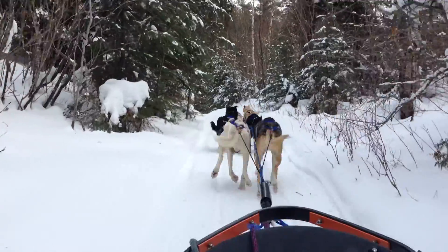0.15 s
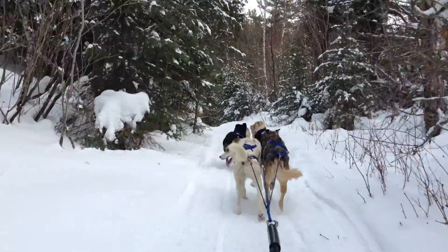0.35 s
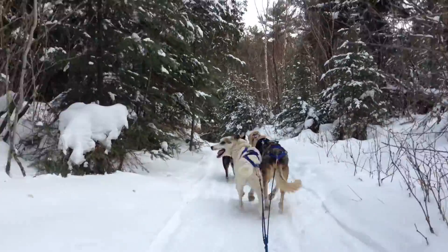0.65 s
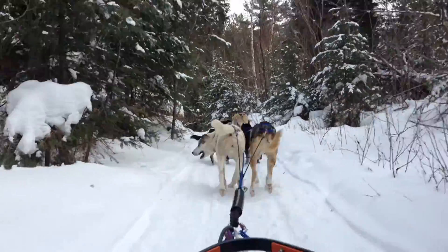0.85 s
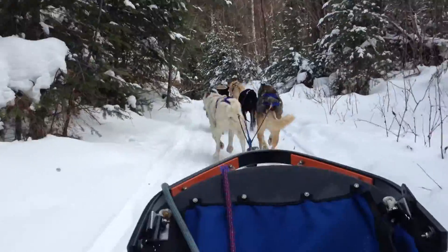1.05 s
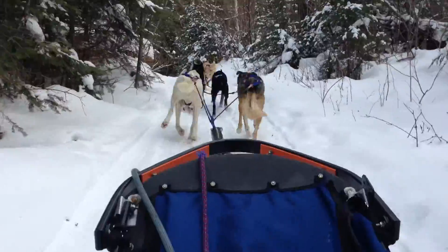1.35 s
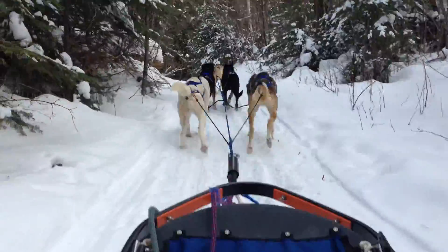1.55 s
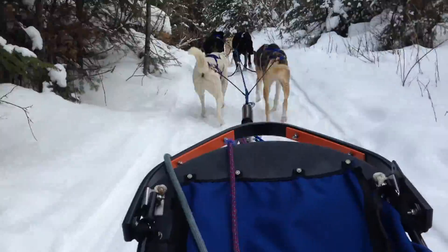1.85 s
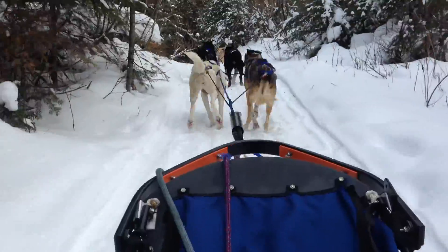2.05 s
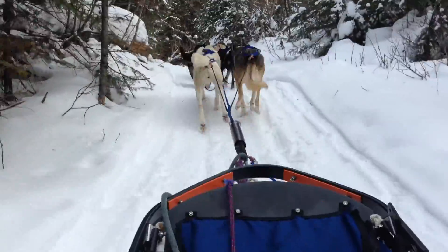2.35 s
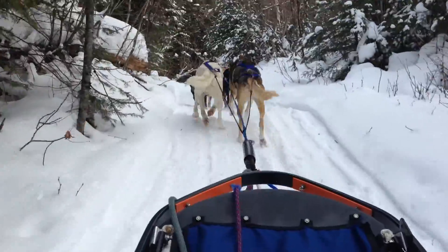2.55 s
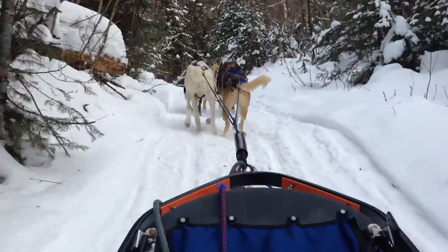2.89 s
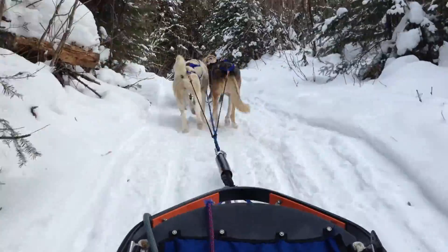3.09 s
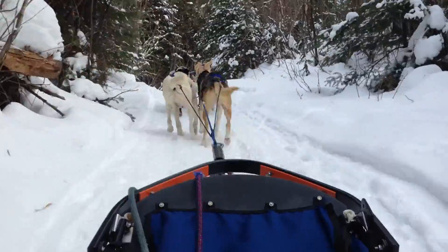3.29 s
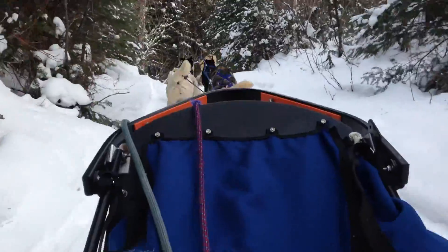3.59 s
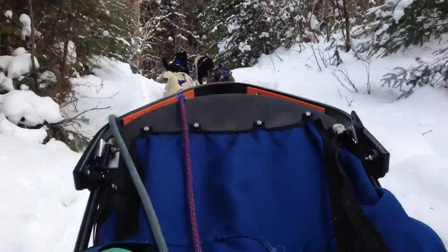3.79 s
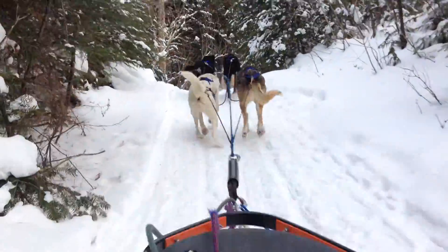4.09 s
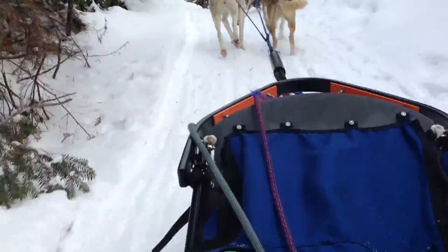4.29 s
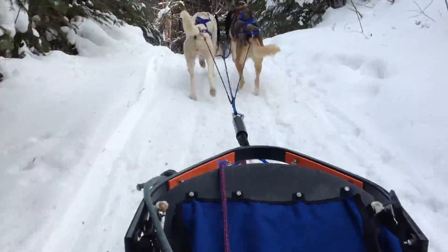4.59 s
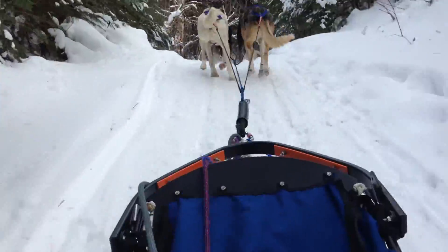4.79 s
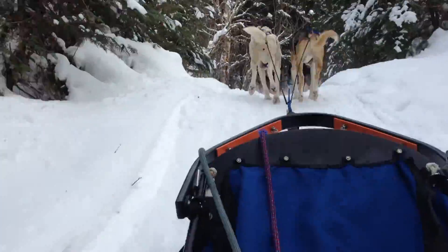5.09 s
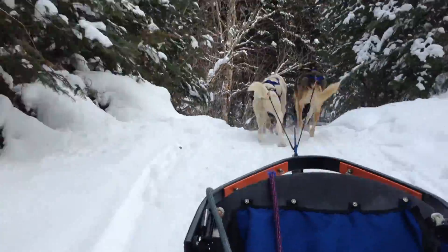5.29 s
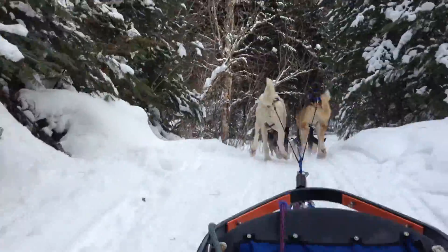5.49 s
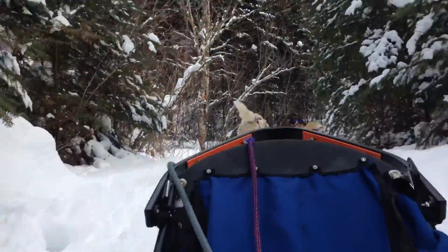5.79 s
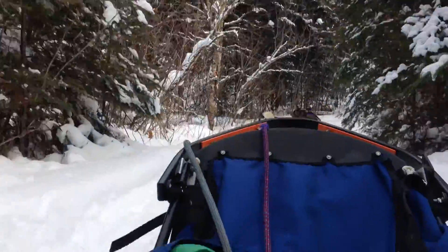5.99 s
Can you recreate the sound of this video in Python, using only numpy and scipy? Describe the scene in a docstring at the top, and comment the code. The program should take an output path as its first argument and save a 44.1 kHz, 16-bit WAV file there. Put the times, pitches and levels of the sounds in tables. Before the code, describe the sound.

Uneven low rumble of sled runners on snow with faint hiss, broken by hard jolting thuds, wooden knocks and brief plastic creaks.

```python
"""A sled's runners rumble, crunch and hiss along a bumpy snow trail: filtered noise plus tiny crust tones.
Jolts thump as short low swings, and noise bursts through resonances make woody knocks of the frame.
The plastic camera mount ticks (filtered clicks), scuffs (filtered noise) and squeals (wavering tones).
Outdoors, on the moving sled: the microphone is in a small camera carried by the driver."""
import sys
import numpy as np
from scipy import signal
from scipy.fft import rfft, irfft, next_fast_len
from scipy.io import wavfile
from scipy.ndimage import uniform_filter1d, minimum_filter1d, map_coordinates

SR = 44100
rng = np.random.default_rng(int(sys.argv[2]) if len(sys.argv) > 2 else 0)


def int16_out(signal):
    """Quantize to a 16-bit WAV file."""
    q = np.round(np.clip(np.atleast_2d(signal).T, -1, 1) * 32767)
    wavfile.write(sys.argv[1], SR, q.astype(np.int16))


N = 270774  # length in samples


def amp(db):
    """Amplitude factor for a level in dB."""
    return 10 ** (np.asarray(db) / 20)


def unit(x):
    """x scaled to an rms of 1."""
    return x / np.sqrt(np.mean(x ** 2) + 1e-20)


def wobble(rate):
    """A smooth random curve, rate knots a second."""
    knots = rng.standard_normal(int(N * rate / SR) + 4)
    return map_coordinates(knots, [np.arange(N) * rate / SR])


def coloured(x, spectrum):
    """x through a causal minimum-phase filter of the (hz, db) shape; white noise keeps its power."""
    m = 2 * next_fast_len(N // 2 + 4096)
    hz, db = np.transpose(spectrum)
    gain = amp(np.interp(np.log(np.fft.rfftfreq(m, 1 / SR) + 1), np.log(hz + 1), db))
    # folding the cepstrum onto positive times makes the filter causal
    cepstrum = irfft(np.log(unit(gain) + 1e-6), m)
    cepstrum[1:m // 2] *= 2
    cepstrum[m // 2 + 1:] = 0
    response = np.exp(rfft(cepstrum))
    return irfft(rfft(x, m) * response, m)[:N]


def gate(rows, rise_ms, fall_ms):
    """Gain that opens at each (start_s, length_ms, level_db) row and dies away after its end."""
    power = np.zeros(N + SR)
    t_ms = np.arange(SR // 5) / SR * 1000
    for start_s, length_ms, level_db in rows:
        rise = 1 - np.exp(-t_ms / rise_ms)
        fall = np.exp(-np.maximum(t_ms - length_ms, 0) / fall_ms)
        power[round(start_s * SR):][:len(t_ms)] += (amp(level_db) * rise * fall) ** 2
    return np.sqrt(power[:N])


def grit(spread_db):
    """White noise whose samples differ widely in size, as breaking crystals do."""
    return unit(rng.standard_normal(N) * amp(spread_db * rng.standard_normal(N)))


def patchy(x, depth_db, size):
    """Random spots of gain over time and pitch: the contact point wanders."""
    z = signal.stft(x, nperseg=128)[2]
    field = rng.standard_normal(z.shape)
    for axis in (0, 1):
        field = uniform_filter1d(field, size, axis)
    return signal.istft(z * amp(depth_db * unit(field)), nperseg=128)[1][:N]


# mount slides regular enough to sing: start_s, length_ms, pitch_hz, level_db (before a fixed lift)
SQUEALS = [(1.601, 17, 5430, -31), (1.632, 20, 5000, -32), (1.641, 7.5, 3480, -30), (1.732, 19, 3190, -58),
           (2.315, 7.6, 8600, -31.5), (2.343, 12, 5350, -34), (4.33, 8, 2650, -46.5),
           (4.432, 6.4, 3420, -54), (4.784, 8.7, 4300, -46), (5.568, 13.7, 5510, -32),
           (5.692, 7, 3320, -36)]


def squeals():
    """Stick and slip at a nearly steady rate: a wavering tone with its octave."""
    out = np.zeros(N)
    for start_s, length_ms, pitch_hz, level_db in SQUEALS:
        t = np.arange(round(length_ms * SR / 1000)) / SR
        wander = np.cumsum(rng.normal(0, 0.093, len(t)))  # radians
        phase = 2 * np.pi * pitch_hz * t + wander
        tone = np.sin(phase) + amp(-11) * np.sin(2 * phase)
        swell = np.sqrt(np.hanning(len(t)))
        out[round(start_s * SR):][:len(t)] += amp(level_db + 3.5) * swell * tone
    return out


# continuous slides of the mount: start_s, length_ms, level_db
SCUFFS = [(.024, 3.7, -40), (.81, 61, -45.5), (.862, 15, -36), (.874, 15.4, -34.5), (.89, 13, -43),
          (1.219, 29, -50), (1.3, 29, -53), (1.604, 9.5, -39), (1.616, 22, -42), (1.634, 20, -32),
          (1.664, 11, -40.5), (1.68, 25, -46.5), (1.73, 12, -44), (2.313, 12.8, -23.5), (2.328, 14, -36.5),
          (2.341, 9, -37), (2.351, 8.9, -28.5), (2.364, 12.5, -41), (2.386, 7.6, -35), (2.397, 16, -46.5),
          (2.766, 98, -53), (3.693, 49, -54.5), (3.764, 6.3, -50), (4.197, 12, -46.5), (4.21, 12.5, -37.5),
          (4.226, 5.4, -40.5), (4.237, 6, -34.5), (4.247, 21, -34), (4.424, 31, -56), (4.782, 24, -50),
          (4.94, 15, -44.5), (5.432, 20, -48.5), (5.514, 15, -43.5), (5.532, 18, -44), (5.548, 8.3, -37),
          (5.57, 22, -41.5), (5.636, 5.3, -44.5), (5.683, 2.5, -44), (5.693, 6.1, -37), (5.703, 56, -54)]
# how the housing colours a slide: freq_hz, relative_db
MOUNT_SPECTRUM = [(880, 1), (1500, -10.5), (2000, 0), (2850, -8.5), (3050, 5.5), (3350, 6.5), (3900, 5.5),
                  (5400, 5), (7400, -3.5), (8200, -7.5), (8800, -5), (10300, -7), (12500, -8.5),
                  (14600, -19), (15600, -20)]


def scuffs():
    """Dense slips of plastic on plastic ring the housing unevenly."""
    uneven = grit(spread_db=3) * amp(0.3 * wobble(370))
    slips = unit(patchy(uneven, depth_db=2.0, size=3))
    return coloured(gate(SCUFFS, rise_ms=1.2, fall_ms=2.2) * slips, MOUNT_SPECTRUM)


# runs of snaps in the mount, a lone snap if length_ms is 0 or less:
# start_s, length_ms, level_db (before lifts and housing filter)
TICKS = [(0.0279, 3.5, -24), (1.2201, 24, -24), (1.3016, 21.5, -26), (1.9209, 22, -38.5),
         (1.9848, -0.5, -34.5), (2.043, -3, -35.5), (2.062, 0, -40.5), (2.3044, 0, -19), (2.3983, 6, -34),
         (2.7666, 34, -30), (2.805, 41, -31.5), (2.9009, -6.5, -40), (3.062, 0, -49), (3.147, 12.5, -25),
         (3.7246, -4, -35), (4.3769, 0, -43), (4.516, 0, -43), (4.577, 0, -40), (5.017, 0, -37.5),
         (5.1953, 0, -33), (5.3054, 0, -41.5), (5.4065, 0, -35), (5.4244, 31, -37.5), (5.4835, 0, -33),
         (5.513, 0, -34), (5.64, 0, -35)]
# how the housing rings to a single snap: freq_hz, relative_db
SNAP_SPECTRUM = [(900, -6), (1800, -10), (2700, -5.5), (3200, -1.5), (5500, 3), (7500, -4.5), (8250, -14),
                 (9000, -8), (10500, -4), (12300, -9.5), (14600, -23), (15600, -48)]
SNAP_GAP_MS, SNAP_SCATTER_MS, SNAP_SPREAD_DB = 6.2, 1.2, 3.5  # within a run
FIRST_SNAP_DB = 3.5  # the snap that breaks the mount loose, over the rest of its run


def ticks():
    """Each snap is one sharp slip, then a weak chatter; in a run they follow at uneven gaps."""
    slips = np.zeros(N + SR)
    for start_s, length_ms, level_db in TICKS:
        count = int(length_ms / SNAP_GAP_MS + .5) + 1
        late, big = rng.standard_normal((2, count))
        follows = np.arange(count) > 0
        offsets_ms = np.linspace(0, length_ms, count) + SNAP_SCATTER_MS * late * follows
        starts = start_s + offsets_ms / 1000
        sizes_db = level_db + 4.5 + np.where(follows, SNAP_SPREAD_DB * big, FIRST_SNAP_DB)
        chatter = 0.091 * np.exp(-np.arange(90) / 30) * rng.standard_normal((count, 90))
        chatter[:, 0] = 1  # the sharp slip itself
        for start, size_db, shape in zip(starts, sizes_db, chatter):
            slips[round(start * SR) - 6:][:90] += amp(size_db) * shape  # placed 6 samples early
    return coloured(slips[:N], SNAP_SPECTRUM)


# hard contacts in the frame: start_s, length_ms, level_db (before the frame and a fixed lift),
# hardness_db (drive of the upper modes against the lower)
KNOCKS = [(0.109, 13, -42, -24), (0.139, 5.1, -36, -6.5), (0.187, 2.6, -39, -7.5),
          (0.513, 10.6, -46.5, -6.5), (0.76, 36, -49, 1.5), (0.796, 52, -42, 0), (0.845, 70, -50.5, 2.5),
          (0.929, 3.5, -34, -22), (1.003, 32, -43, -20), (1.041, 33, -39.5, -17), (1.273, 6.3, -39.5, -3),
          (1.586, 14.5, -33, -6.5), (1.606, 7.1, -34.5, 0.5), (1.619, 1.9, -25.5, -0.5),
          (1.626, 16, -54, -1), (1.912, 5.9, -44.5, -12), (1.985, 3.2, -48.5, -5.5),
          (2.299, 10.3, -28.5, -4.5), (2.337, 12, -50, 4), (3.145, 18, -53, -3), (3.325, 14, -36.5, -3.5),
          (3.341, 17, -35, -7), (3.417, 9.5, -43, -15), (3.481, 11.6, -35.5, -11.5), (3.496, 16, -44.8, -9),
          (3.517, 12, -48, -0.5), (3.668, 20, -48, -4.5), (3.884, 5.7, -34.5, 0), (4.194, 13, -41, -1.5),
          (4.211, 13, -36, -1.5), (4.225, 19, -32.5, -2), (4.237, 3.7, -23, -2), (4.878, 4.1, -42.5, -10),
          (4.899, 20, -45.2, -6), (4.965, 4.9, -28, -3.5), (5.278, 15, -43.5, -6.3), (5.327, 17, -47, -4),
          (5.525, 22, -35, -5.5), (5.547, 12, -36.5, -3), (5.574, 32, -53, 2), (5.682, 8.1, -37, 3.5),
          (5.723, 17, -42, -7), (5.755, 28, -48, 0.5), (5.862, 3.5, -41, -2), (5.934, 9.1, -43.5, -9.5)]
# modes of the wooden frame: centre_hz, width_hz, relative_db
WOOD_MODES = [(459, 63, 3), (692, 104, 0), (900, 165, -4.5), (1406, 227, -2), (1984, 510, -5),
              (2720, 490, -8), (3310, 570, -9), (5230, 3700, -21)]


def knocks():
    """Uneven bursts of small blows ring the frame; harder contacts reach its upper modes."""
    rattle = grit(spread_db=7.5) * amp(0.29 * wobble(250))
    soft_rows = [(s, ms, db) for s, ms, db, hard_db in KNOCKS]
    hard_rows = [(s, ms, db + hard_db) for s, ms, db, hard_db in KNOCKS]
    soft = gate(soft_rows, rise_ms=0.57, fall_ms=3.05)
    hard = gate(hard_rows, rise_ms=0.85, fall_ms=3.6)
    m = next_fast_len(N + 8192)
    f = np.fft.rfftfreq(m, 1 / SR)
    modes = []
    for k, (centre, width, db) in enumerate(WOOD_MODES):
        resonance = 1j * f * width / (centre ** 2 - f ** 2 + 1j * f * width)
        modes.append((-1) ** k * amp(db) * resonance)  # neighbours in opposite phase
    lower, upper = sum(modes[:3]), sum(modes[3:])
    ringing = rfft(soft * rattle, m) * lower + rfft(hard * rattle, m) * upper
    return irfft(ringing, m)[:N] * amp(16.5)


# levels of the runners on snow along the trail: time_s, rumble_db, crunch_db, hiss_db
GLIDE = [(0.0, -35.5, -41.5, -44.5), (0.08, -37.5, -55, -52.5), (0.34, -39, -56.5, -58),
         (0.58, -40, -55, -52), (0.85, -29.5, -61, -49.5), (1.06, -29.5, -46, -51),
         (1.3, -43.5, -52.5, -56), (1.5, -38.5, -55, -58), (1.64, -34, -54, -50), (1.85, -37.5, -57, -61),
         (2.07, -51, -65, -66), (2.25, -46.5, -61, -64.5), (2.36, -37, -57, -52), (2.72, -39.5, -55.5, -59),
         (2.97, -44.5, -58.5, -64), (3.15, -37.5, -55.5, -52.5), (3.5, -29.5, -50.5, -53),
         (3.73, -42, -54, -55), (4.34, -40, -55.5, -56.5), (4.6, -47.5, -61, -62),
         (4.89, -37.5, -53, -49.5), (5.12, -32.5, -52.5, -55), (5.42, -43, -57, -59), (5.6, -29, -53, -50),
         (5.76, -30, -49, -56), (5.9, -39.5, -60, -57), (6.14, -40.5, -55.5, -61.5)]


def glide():
    """Rumble, crunch and hiss levels in dB, one value per sample."""
    time_s, *levels = np.transpose(GLIDE)
    return [np.interp(np.arange(N) / SR, time_s, db) for db in levels]


BUMP_DB, BUMP_SPREAD_DB = 1, 1.5  # level over the rumble, and its random excess
BUMP_HZ, BUMP_OCTAVES, BUMP_MS = 195, 0.27, 7.3  # pitch, its scatter, length


def bumps(count):
    """Small random jolts that grow with the rumble: rows like those of THUMPS."""
    when = rng.random(count) * (N - 1)
    big = np.minimum(rng.exponential(size=count), 3)
    level_db = glide()[0][when.astype(int)] + BUMP_DB + BUMP_SPREAD_DB * big
    pitch_hz = BUMP_HZ * 2 ** (BUMP_OCTAVES * rng.standard_normal(count))
    return list(zip(when / SR, level_db, pitch_hz, np.full(count, BUMP_MS)))


# jolts of the frame: middle_s, level_db (peak of the swing alone), pitch_hz,
# length_ms (width at half height)
THUMPS = [(0.006, -19, 212, 13), (0.089, -23, 168, 5.8), (0.1445, -25, 184, 12), (0.1922, -23.5, 204, 13),
          (0.5725, -19.1, 171, 13.3), (0.762, -22.5, 182, 11), (0.8004, -16.5, 182, 13.7),
          (0.828, -13.5, 147, 25), (0.8686, -11.5, 160, 8.7), (0.885, -20, 139, 5.2),
          (0.913, -23.5, 205, 11), (0.9984, -18.5, 188, 7.8), (1.061, -13, 186, 8.1),
          (1.0841, -14.5, 193, 12), (1.1344, -21.5, 184, 13), (1.2814, -21, 231, 15), (1.401, -25, 208, 15),
          (1.595, 1.5, 144, 9.1), (1.607, -14.5, 189, 7.2), (1.624, -5.5, 156, 6.7), (1.633, -12, 245, 7.4),
          (1.668, -21, 181, 7.6), (1.6997, -16, 190, 6.2), (1.8498, -25, 214, 8.6), (1.988, -27, 205, 10.6),
          (2.3054, 1, 118, 6.7), (2.315, -11, 167, 6), (2.323, -9, 190, 5.1), (2.3418, -20, 182, 5.4),
          (2.4906, -21.5, 195, 12), (2.522, -23, 169, 4.3), (2.56, -25, 190, 7.9),
          (2.5778, -22.5, 140, 5.5), (3.1381, -25, 138, 31), (3.165, -20, 138, 5.8),
          (3.2034, -22, 258, 2.6), (3.223, -22, 143, 6.1), (3.323, -15, 158, 9.1), (3.3438, -22, 229, 35),
          (3.3634, -21.5, 213, 5.4), (3.426, -18, 171, 15), (3.488, -11, 179, 7.1),
          (3.6863, -25.5, 173, 20), (3.778, -26, 250, 6), (3.8909, -13.5, 213, 11.5),
          (4.2011, -2.5, 150, 8.6), (4.219, -1, 174, 10), (4.234, -22, 150, 7.9), (4.2438, -5.5, 239, 6.5),
          (4.255, -13.5, 163, 6.2), (4.7886, -24.2, 156, 16.3), (4.8852, -25.5, 191, 6.8),
          (4.9137, -7, 176, 8.1), (4.93, -20.5, 149, 14), (4.958, -18, 208, 13), (4.972, -8.8, 195, 9.7),
          (4.9926, -22, 160, 12), (5.0704, -30, 170, 6.9), (5.117, -20, 265, 2.5), (5.132, -19.2, 119, 7.7),
          (5.166, -23, 302, 2.1), (5.28, -19, 282, 4.3), (5.448, -27, 206, 12), (5.5417, -2, 153, 8.1),
          (5.55, -9, 185, 6), (5.567, -18, 171, 10), (5.619, -15.5, 195, 7.8), (5.6832, -3.5, 169, 7.7),
          (5.696, -14.5, 186, 9), (5.736, -17, 141, 13), (5.7627, -24, 145, 16), (5.8687, -23, 208, 28),
          (5.946, -24, 200, 9.5)]
SHOVE_DB, SHOVE_GROWS = -25.5, 0.38  # shove over a 0 dB jolt; stronger jolts shove more, dB per dB


def thumps():
    """Each jolt swings the frame for a few cycles, shoves the sled far lower, and rings the basket."""
    half = SR // 20
    out = np.zeros(N + 3 * half)
    t = np.arange(-half, half) / SR
    ring_decay_s = np.where(t < 0, .002, .008)  # quick build-up, slower decay
    ring = amp(-22.5) * np.exp(-np.abs(t) / ring_decay_s) * np.sin(2 * np.pi * 330 * t)
    push = np.exp(-(t / 0.018) ** 2) * np.sin(2 * np.pi * 55 * t)
    for middle_s, level_db, pitch_hz, length_ms in THUMPS + bumps(count=80):
        side = np.sign(rng.standard_normal())  # first push up or down
        swing = .5 ** ((2 * t * 1000 / length_ms) ** 2) * np.cos(2 * np.pi * pitch_hz * t)
        shove = amp(SHOVE_DB + SHOVE_GROWS * level_db) * push
        out[round(middle_s * SR):][:len(t)] += side * amp(level_db) * (swing + shove + ring)
    return out[half:half + N]


def crackle(count, hz, octaves, cycles, spread_db):
    """Snow crust breaking: many short damped tones of scattered pitch and size."""
    when, high, big = rng.random(count), rng.standard_normal(count), rng.standard_normal(count)
    pitch = hz * 2 ** np.clip(octaves * high, -1.5, 2)[:, None]
    k = np.arange(600)  # samples in each tone
    turns = pitch * k / SR
    tones = np.sin(2 * np.pi * turns) * np.exp(-turns / cycles) * amp(spread_db * big)[:, None]
    spots = (when * N).astype(int)[:, None] + k
    return unit(np.bincount(spots.ravel(), tones.ravel())[:N])


# spectra of the runners on snow, each: freq_hz, relative_db
RUMBLE_SPECTRUM = [(12, -72), (20, -18.5), (91, -7.5), (140, 0), (178, 1), (226, 0.5), (290, -9),
                   (420, -39.5), (700, -26), (1500, -120)]
CRUNCH_SPECTRUM = [(250, -11), (420, 3.5), (900, -11), (2000, -9), (3000, -23), (6000, -41)]
HISS_SPECTRUM = [(1200, -2), (2500, -3), (5000, -5), (8000, -11.5), (12700, -15), (15500, -14.5)]
# the basket's hollow ring: freq_hz, relative_db
HOLLOW_SPECTRUM = [(150, -58), (280, -9.5), (345, 3.5), (385, -4), (450, -30), (900, -50.5)]
# the basket is shaken into a louder hum: start_s, length_ms, level_db
HUMS = [(.13, 90, -42.5), (.8, 53, -28), (.99, 90, -36.5), (1.26, 27, -36.5), (1.585, 53, -28.5),
        (1.69, 29, -44), (2.3, 31, -26), (2.54, 52, -45), (2.73, 24, -53), (3.07, 19, -39.5),
        (3.18, 32, -44), (3.32, 36, -31), (3.47, 50, -38.5), (3.76, 21, -40), (3.885, 12, -29.5),
        (4.19, 71, -28), (4.49, 24, -40), (4.74, 15, -40.5), (4.95, 40, -48), (5.08, 110, -38.5),
        (5.26, 41, -31), (5.32, 32, -41.5), (5.53, 28, -37), (5.615, 17, -45), (5.675, 21, -32.5),
        (5.84, 34, -39)]
BASKET_DB = -15  # steady hum of the basket over the rumble


def runners():
    """Small bumps come in lumps that shake rumble, basket and crunch together; the hiss is smoother."""
    rumble_db, crunch_db, hiss_db = glide()
    lumps, sway = wobble(45), wobble(9)

    rumble_noise = coloured(rng.standard_normal(N), RUMBLE_SPECTRUM)
    rumble = unit(amp(2.66 * lumps + 1.2 * sway) * rumble_noise)

    hollow_noise = coloured(rng.standard_normal(N), HOLLOW_SPECTRUM)
    hollow = unit(amp(1.1 * lumps + 1.47 * sway) * hollow_noise)
    hum_gain = np.hypot(amp(rumble_db + BASKET_DB), gate(HUMS, rise_ms=2.9, fall_ms=10))

    breaking = crackle(count=3000, hz=1075, octaves=0.894, cycles=13.0, spread_db=5.0)
    crust = coloured(grit(spread_db=4.5), CRUNCH_SPECTRUM) + 0.74 * breaking
    crunch = unit(amp(2.2 * lumps + 1.5 * wobble(90)) * crust)

    powder = patchy(grit(spread_db=1.5), depth_db=1.6, size=5)
    hiss = unit(amp(0.58 * lumps + 1.6 * wobble(23.19)) * coloured(powder, HISS_SPECTRUM))

    snow = amp(rumble_db) * rumble + amp(crunch_db) * crunch + amp(hiss_db) * hiss
    return snow + hum_gain * hollow


def scene():
    """Mount, frame and runners summed into one channel."""
    return (squeals() + scuffs() + ticks() + knocks() + thumps() + runners())[None]


# the microphone's own noise: freq_hz, relative_db
SELF_NOISE_SPECTRUM = [(100, -27), (400, 5), (2000, -8.5), (8000, -21), (15600, -22)]
TOP_HZ = 15700  # band limit


def record(dry):
    """Faint self-noise, a fast limiter on the hardest jolts, nothing above the band limit."""
    heard = dry + amp(-70.5) * coloured(rng.standard_normal(N), SELF_NOISE_SPECTRUM)
    needed = np.minimum(1, .705 / (np.abs(heard) + 1e-9))
    # hold the lowest gain over 180 samples (4 ms), then smooth it
    gain = uniform_filter1d(minimum_filter1d(needed, size=180), size=180)
    m = next_fast_len(N + 4096)
    in_band = np.fft.rfftfreq(m, 1 / SR) < TOP_HZ
    return irfft(rfft(heard * gain, m) * in_band, m)[:, :N]


dry = scene()
out = record(dry)
int16_out(out)
```